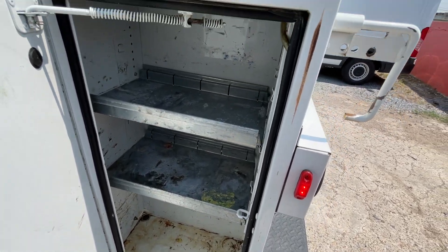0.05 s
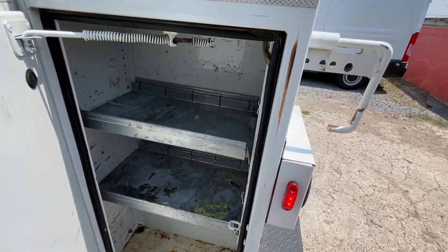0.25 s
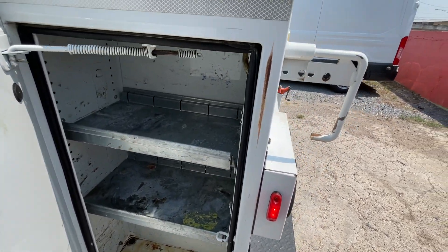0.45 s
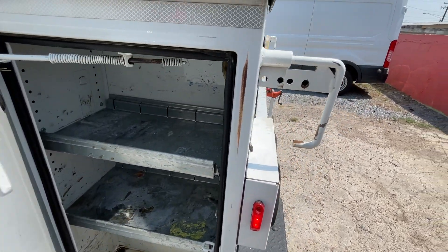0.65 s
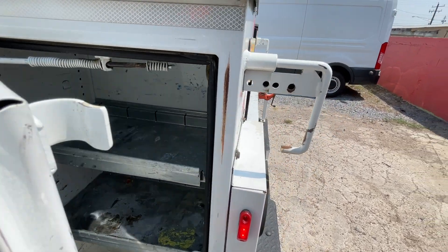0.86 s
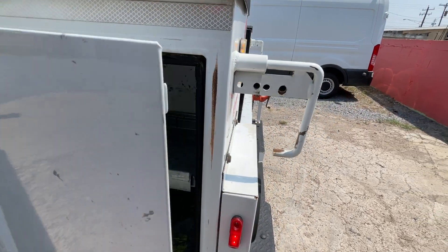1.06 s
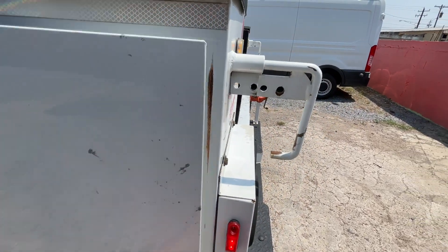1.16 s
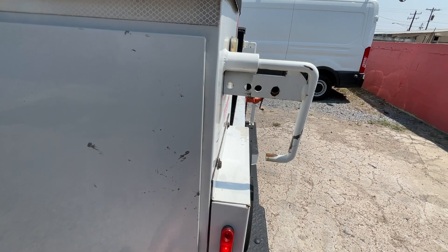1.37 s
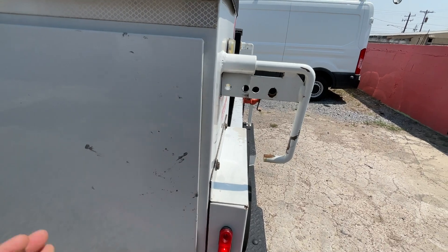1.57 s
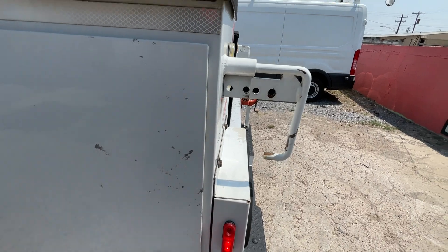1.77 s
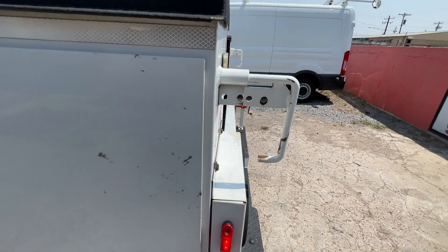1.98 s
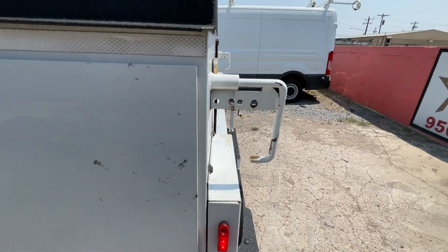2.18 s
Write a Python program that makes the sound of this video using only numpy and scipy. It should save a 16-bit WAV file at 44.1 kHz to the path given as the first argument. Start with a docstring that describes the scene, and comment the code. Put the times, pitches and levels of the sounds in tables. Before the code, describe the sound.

One close slam of a steel truck compartment door, ringing out briefly outdoors.

```python
"""A steel compartment door on a truck body is slammed, close by, on an open lot.
The latch meets its striker, the door hits the frame and pushes out a thump of air, then the bolt
snaps home. Panels and shelves ring on, and a wall answers faintly. Small metal parts tick
before and after the slam; behind it all are a distant rumble and a soft drifting hiss."""
import sys
import numpy as np
from scipy import signal
from scipy.fft import rfft, irfft, next_fast_len
from scipy.io import wavfile
from scipy.ndimage import map_coordinates

SR = 44100
rng = np.random.default_rng(int(sys.argv[2]) if len(sys.argv) > 2 else 0)


def master_out(mix):
    """Clip the mix to full scale and print it as 16-bit PCM to the path in sys.argv[1]."""
    frames = np.transpose(np.atleast_2d(mix))
    ceiling = np.clip(frames, -1, 1)
    pcm = np.round(ceiling * 32767).astype(np.int16)
    wavfile.write(sys.argv[1], SR, pcm)


N = 98210
SLAM_S = 1.169


def amp(db):
    """Turn decibels into a number to multiply by."""
    return 10 ** (np.asarray(db) / 20)


def unit(x):
    """Scale x to an average (rms) level of 1."""
    return x / np.sqrt(np.mean(x ** 2) + 1e-20)


def along(points, hz):
    """Read between rows of (Hz, value), with octaves evenly spaced."""
    freqs, values = np.transpose(points)
    return np.interp(np.log(hz + 1), np.log(freqs + 1), values)


def bump(f, centre_hz, octaves):
    """A bell curve of height 1 around one pitch."""
    return np.exp(-.5 * (np.log2((f + 1) / centre_hz) / octaves) ** 2)


def since(s):
    """Seconds since time s, zero before it."""
    return np.maximum(np.arange(N) / SR - s, 0)


def fade(t, fade_s):
    """Die away; a fade time is how long a 60 dB drop takes."""
    return np.exp(-np.log(1000) * t / fade_s)


def rise(t, rise_s):
    """Build up from silence."""
    return 1 - np.exp(-t / rise_s)


def filtered(x, gain):
    """Turn each frequency of x up or down by gain(Hz)."""
    size = next_fast_len(N + SR // 2)
    return irfft(rfft(x, size) * gain(np.fft.rfftfreq(size, 1 / SR)), size)[:N]


def noise(gain):
    """Noise at level 1, its tone shaped by gain(Hz)."""
    return unit(filtered(rng.standard_normal(N), gain))


def wobble(rate):
    """A smooth curve through `rate` random points a second."""
    return map_coordinates(rng.standard_normal(N // 100), [since(0) * rate])


def ring(tones, t):
    """Pure tones, each fading at its own speed."""
    return sum(amp(db) * fade(t, fade_s) * np.sin(2 * np.pi * hz * t) for hz, db, fade_s in tones)


def dying(x, s, fade_times):
    """Fade x from time s on, each frequency at its own speed."""
    hz, t, bands = signal.stft(x, SR, nperseg=256)
    bands = bands * fade(np.maximum(t - s, 0), along(fade_times, hz)[:, None])
    return signal.istft(bands, SR, nperseg=256)[1][:N]


# The rumble's tone. Each row: frequency in Hz, relative level in dB.
RUMBLE_TONE = [(15, -3), (28, 0.5), (48, -5), (80, -1.5), (125, -4), (180, -13), (270, -11.5), (380, -19.5),
               (600, -18.5), (850, -16.5), (1300, -22.5), (2000, -29), (3000, -35.5), (4700, -37),
               (7000, -41.5), (9700, -41.5), (11700, -53), (15500, -52.5)]

def distant_rumble():
    """Low, far-off noise whose level wavers slightly."""
    level_db = -45.5 + 0.5 * wobble(8.24)
    return amp(level_db) * noise(lambda f: amp(along(RUMBLE_TONE, f)))


# The hiss's tone with the door open, then shut. Each row: frequency in Hz, relative level in dB.
HISS_OPEN_TONE = [(150, 11.5), (280, 14.5), (500, 8.5), (1100, 7.5), (1900, -1), (2400, 2.5), (3050, -6),
                  (3460, 4), (3900, -2), (4500, -4), (6050, 1), (6900, -8.5), (7700, -4.5), (8400, -8.5),
                  (9600, -9.5), (11500, -14.5), (13500, -19), (15300, -18)]
HISS_SHUT_TONE = [(150, -5), (300, 12), (900, 5), (1700, 3.5), (1930, 10), (2250, 3), (3000, -1.5),
                  (3700, 1.5), (4300, -2.5), (5200, 1), (6400, -6.5), (7400, -11), (8700, -7.5),
                  (10400, -10), (11500, -21.5), (13000, -18), (15500, -27)]
# How the hiss drifts. Each row: time in seconds, level in dB.
HISS_DRIFT = [(0, -67), (.11, -68), (.22, -56.5), (.41, -52.5), (.52, -48), (.7, -50), (1.0, -53),
              (1.15, -54), (1.36, -62), (1.57, -64), (1.72, -52.5), (1.96, -50.5), (2.22, -49.5)]

def hiss():
    """A soft hiss swells, sinks after the slam and comes back with another tone."""
    before = noise(lambda f: amp(along(HISS_OPEN_TONE, f)))
    after = noise(lambda f: amp(along(HISS_SHUT_TONE, f)))
    level_db = np.interp(since(0), *np.transpose(HISS_DRIFT)) + .4 * wobble(14)
    return amp(level_db) * np.where(since(SLAM_S) > 0, after, before)


# Small metal noises. Each row: start in seconds, level in dB, pitch in Hz, width in octaves,
# fade time in seconds.
METAL_TICKS = [(.044, -54, 7000, .8, .012), (.343, -54, 8000, 0.87, 0.021), (0.406, -44, 289, 0.34, 0.16),
               (.437, -54, 10000, 1, .06), (0.502, -45, 6000, .6, 0.011), (.969, -46.5, 8000, .35, 0.019),
               (1.1446, -48, 6000, 0.65, 0.012), (1.326, -24.5, 330, 0.3, 0.057),
               (1.390, -43, 3680, 0.21, 0.016), (1.518, -52, 4700, .25, .02),
               (1.523, -56.5, 9500, .2, 0.023), (1.536, -47.5, 2500, .25, .025)]

def ticks():
    """The hinge, stay spring and settling metal tick and knock as the door swings and once it is shut."""
    out = np.zeros(N)
    for start, db, hz, octaves, fade_s in METAL_TICKS:
        t = since(start)
        tick = noise(lambda f: bump(f, hz, octaves))
        out += amp(db) * tick * rise(t, rise_s=.0004) * fade(t, fade_s)
    return out


# Four hits: the latch touches, the door meets the frame, the door seats, the bolt snaps.
# Each row: start in seconds, clash level in dB, its fade time in seconds, crack level in dB,
# bass boost in dB, a pitch to boost in Hz, that boost in dB, latch ring level in dB.
STEEL_HITS = [(1.1578, -17, .07, -43, 0.5, 4400, 0, -29), (1.1689, -15.5, .03, -17.5, 9.5, 8800, 8, -31),
              (1.1707, -8, 0.041, -16.5, 7.5, 980, 1, -26.5),
              (1.202, -16, 0.055, -12.5, -3.5, 8810, 10.5, -30)]
# The tone of steel on steel. Each row: frequency in Hz, relative level in dB.
CLASH_TONE = [(150, -20), (430, -10.5), (700, 3.5), (1300, 4), (2300, -0.5), (3300, -8.5), (4400, -1.5),
              (6500, -0.5), (7900, -3.5), (10300, -4), (11600, -14), (13700, -16.5), (14900, -2),
              (15500, -9), (16500, -30.5)]
# Latch and striker tones. Each row: pitch in Hz, relative level in dB, fade time in seconds.
LATCH_TONES = [(4160, -1, 0.072), (5023, -5, .08), (6450, -6, .09), (6650, 0, 0.071), (7844, -13, .1),
               (8479, -4, 0.11), (8850, -7, 0.12), (10260, 3, .08), (10310, -8, .07), (14800, -10, .06)]
BASS_BELOW_HZ, CRACK_PEAK_S = 2200, 0.00086

def steel_hits():
    """Steel strikes steel: each hit is a sharp crack and a short clash that also rings the latch."""
    out = np.zeros(N)
    for start, db, fade_s, crack_db, bass_db, boost_hz, boost_db, ring_db in STEEL_HITS:
        t = since(start)
        steel = noise(lambda f: amp(along(CLASH_TONE, f)
                                    + bass_db / (1 + (f / BASS_BELOW_HZ) ** 2)
                                    + boost_db * bump(f, boost_hz, octaves=0.12)))
        spike = (t / CRACK_PEAK_S * np.exp(1 - t / CRACK_PEAK_S)) ** 2
        crack = amp(crack_db) * steel * spike
        clash = amp(db) * steel * fade(t, fade_s)
        latch = amp(ring_db) * ring(LATCH_TONES, t)
        out += crack + rise(t, rise_s=0.00032) * (clash + latch)
    return out


# Ringing tones after the slam, including a short one near 960 Hz.
# Each row: pitch in Hz, relative level in dB, fade time in seconds.
SLAM_TONES = [(71.3, -6, 0.97), (109.8, -6, 0.81), (204.6, -6, 0.74), (273.5, 2, 0.65), (314.6, -4, 0.6),
              (359.4, -1, 0.54), (386.6, -5, 0.78), (478, -10.5, 0.81), (505, -4.5, .7),
              (537.4, -0.5, 0.48), (865, -3, 0.28), (958, -2.5, 0.22), (1215, 1.5, 0.21), (1300, -2, 0.27)]

def slam_ring():
    """Tones ring on after the slam, the low ones mostly lasting longer."""
    t = since(SLAM_S)
    return amp(-23.5) * rise(t, rise_s=0.0029) * ring(SLAM_TONES, t)


# The tone of the compartment's walls and shelves. Each row: frequency in Hz, relative level in dB.
SHELF_TONE = [(40, -23), (75, -6), (115, 0), (170, -1.5), (280, -1.5), (400, -4), (550, -1), (800, -6),
              (1300, -8.5), (1800, -11.5), (2400, -17.5), (3000, -22.5), (5000, -22.5), (9000, -22.5),
              (10400, -26), (11800, -43.5), (13700, -42), (14800, -32), (16000, -46)]
# How long they ring. Each row: frequency in Hz, fade time in seconds.
SHELF_FADES = [(70, 0.85), (300, 0.75), (520, 0.67), (680, 0.4), (2000, 0.3), (5000, 0.28), (10000, .22),
               (15000, .18)]

def walls_and_shelves():
    """Walls and shelves ring with so many weak tones that they blur into fading noise."""
    blur = noise(lambda f: amp(along(SHELF_TONE, f)))
    return amp(-17.5) * rise(since(SLAM_S), rise_s=0.0027) * dying(blur, SLAM_S, SHELF_FADES)


THUMP_S, THUMP_WIDTH_S = 1.1759, 0.0023

def air_thump():
    """The door squeezes the air as it seals: one push, then one pull."""
    offset = (since(0) - THUMP_S) / THUMP_WIDTH_S
    return -amp(-9.5) * offset * np.exp(.5 * (1 - offset ** 2))


# How long sound lingers on the lot. Each row: frequency in Hz, fade time in seconds.
LOT_FADES = [(200, 0.5), (800, 0.41), (2000, 0.45), (6000, 0.34), (10000, 0.3), (14500, 0.21)]
WALL_DELAY_S = 0.107

def lot_echoes(sound):
    """Sound scatters around the lot, and a wall sends back one blurred echo."""
    scatter = dying(rng.standard_normal(N), 0, LOT_FADES) * rise(since(0), rise_s=.01)
    t = since(WALL_DELAY_S)
    dulled = noise(lambda f: 1 / (1 + (f / 8000) ** 2))
    wall = dulled * rise(t, rise_s=0.0055) * fade(t, fade_s=.12)
    echoes = (amp(-22) * unit(scatter) + amp(-35.5) * unit(wall)) / np.sqrt(N)
    return signal.fftconvolve(sound, echoes)[:N]


def scene():
    """Add the door, its echoes and the background into one channel."""
    door = steel_hits() + slam_ring() + walls_and_shelves() + ticks()
    return (door + air_thump() + lot_echoes(door) + distant_rumble() + hiss())[None]


PEAK_LIMIT, TOP_HZ = .92, 15900

def record(dry):
    """Round off the loudest peaks and cut the very highest treble."""
    rounded = dry[0] / (1 + np.abs(dry[0] / PEAK_LIMIT) ** 6) ** (1 / 6)
    return filtered(rounded, lambda f: np.clip((TOP_HZ - f) / 200 + .5, 0, 1))[None]


dry = scene()
out = record(dry)
master_out(out)
```